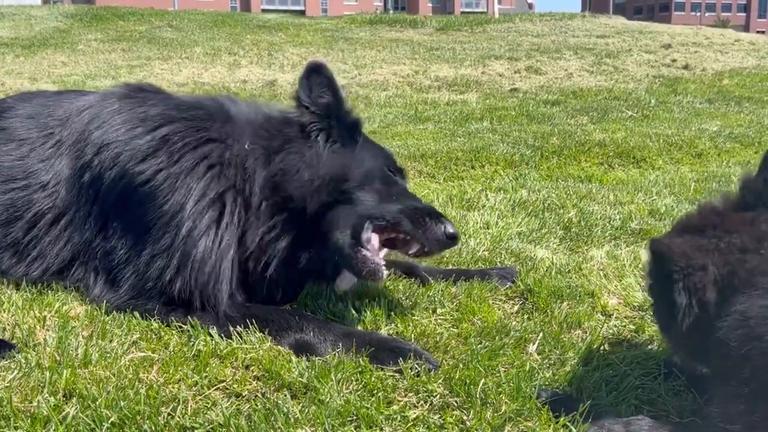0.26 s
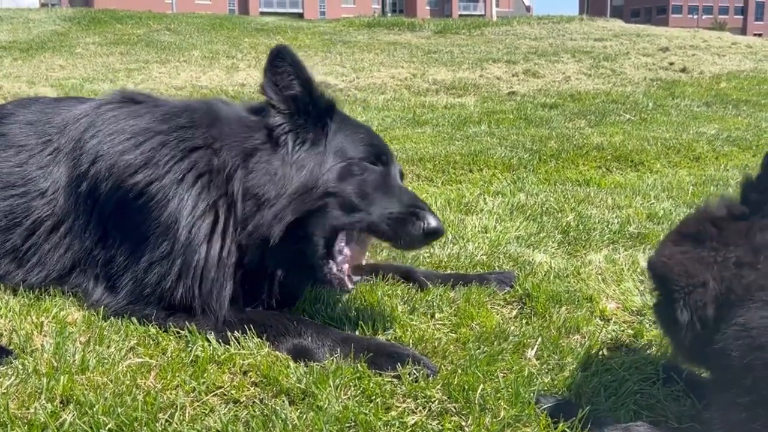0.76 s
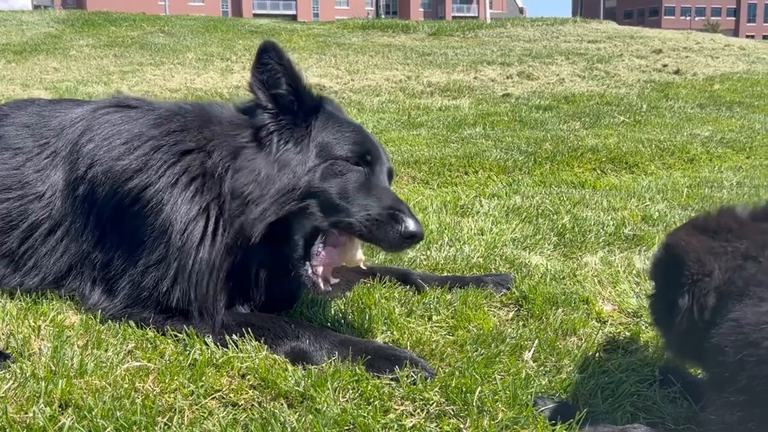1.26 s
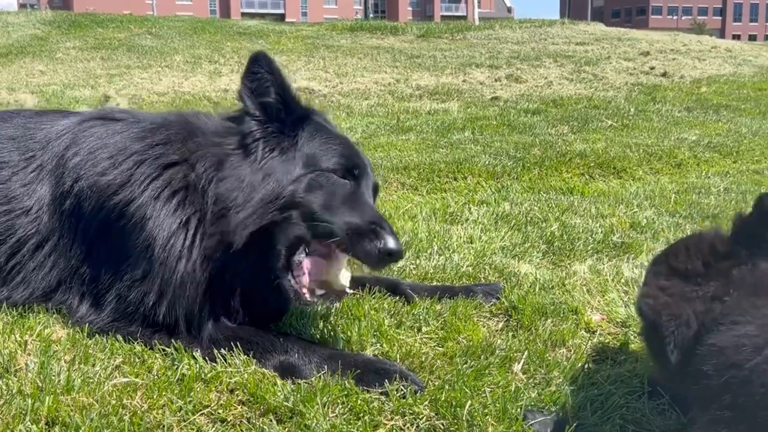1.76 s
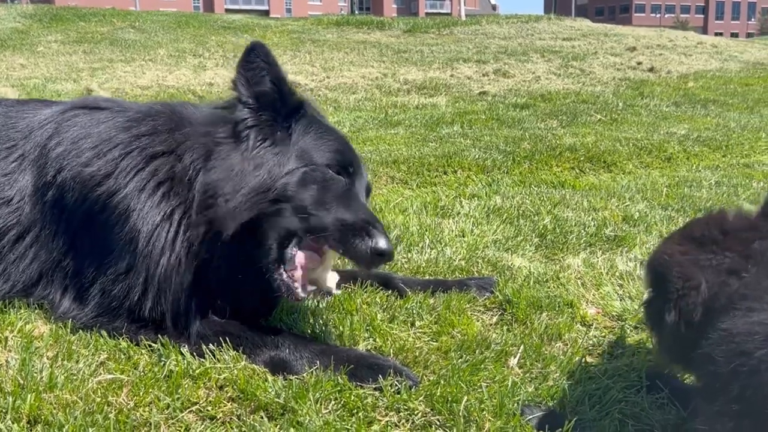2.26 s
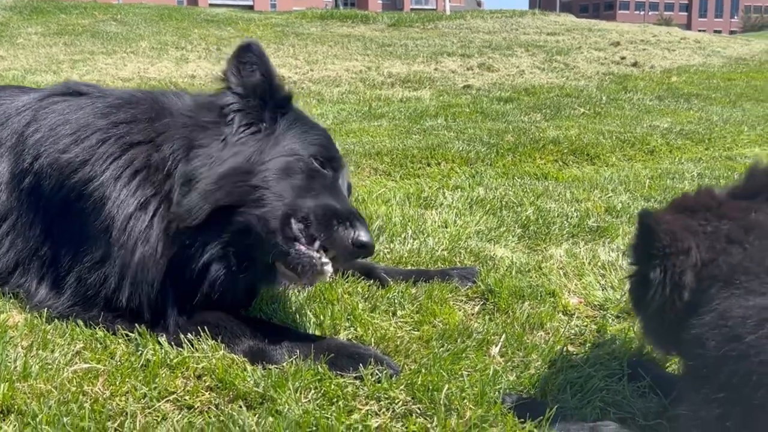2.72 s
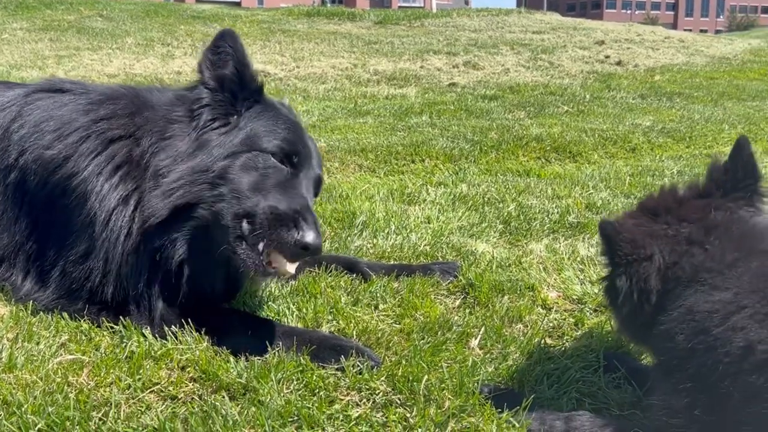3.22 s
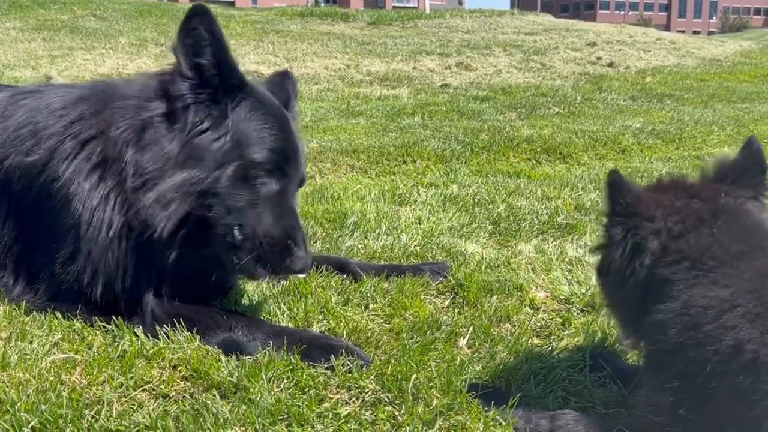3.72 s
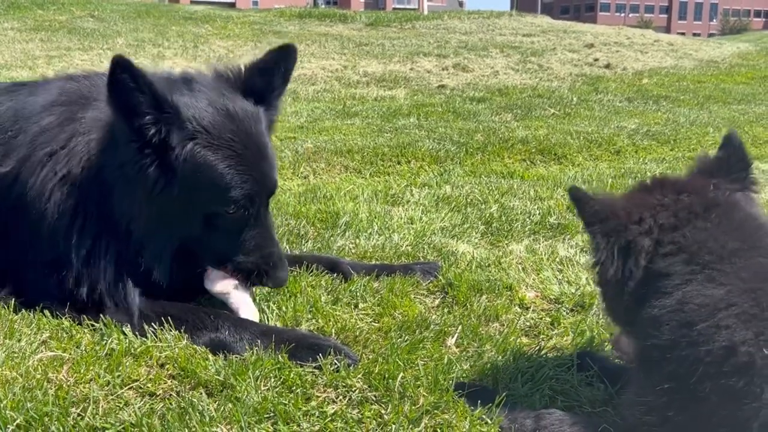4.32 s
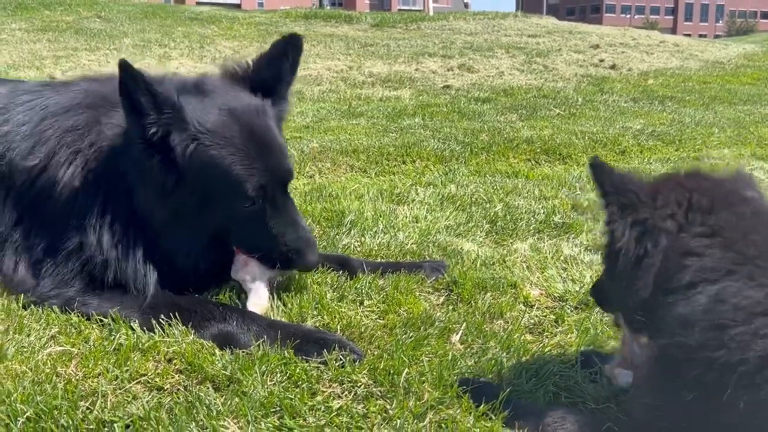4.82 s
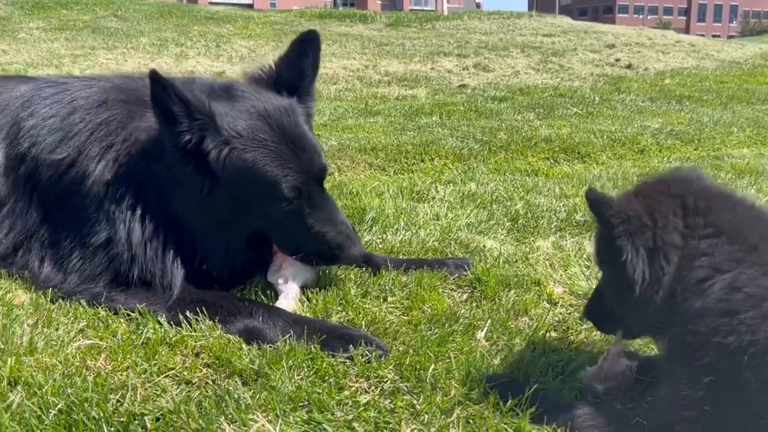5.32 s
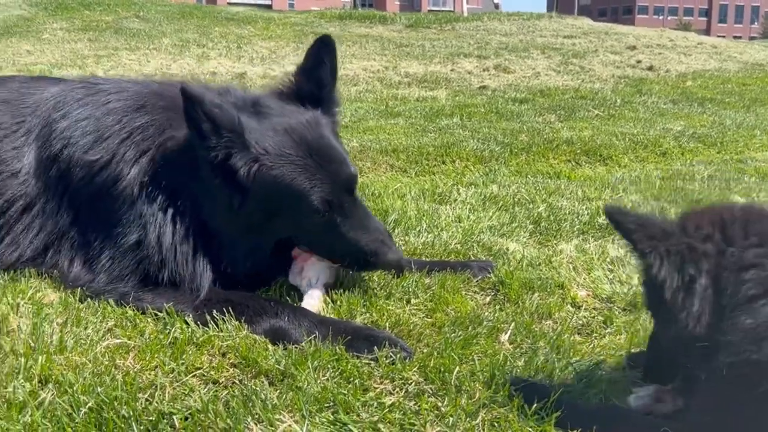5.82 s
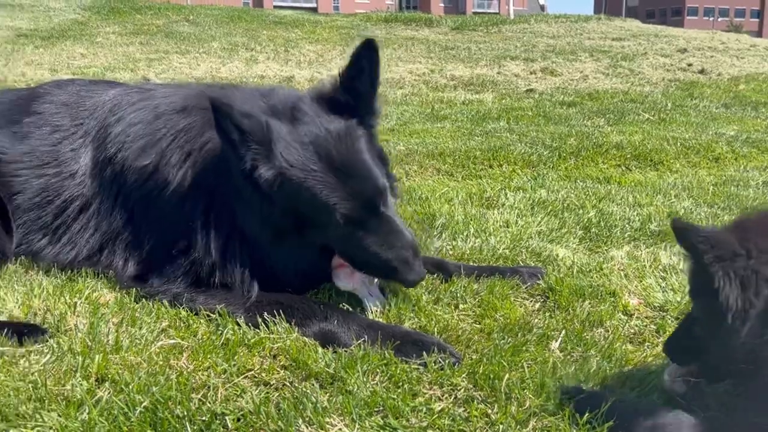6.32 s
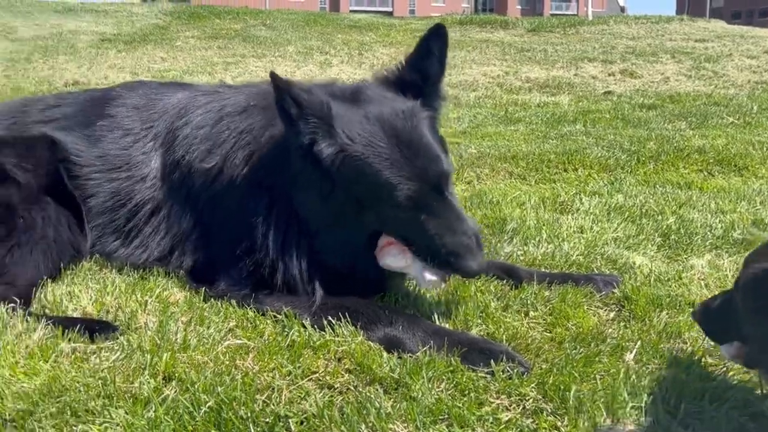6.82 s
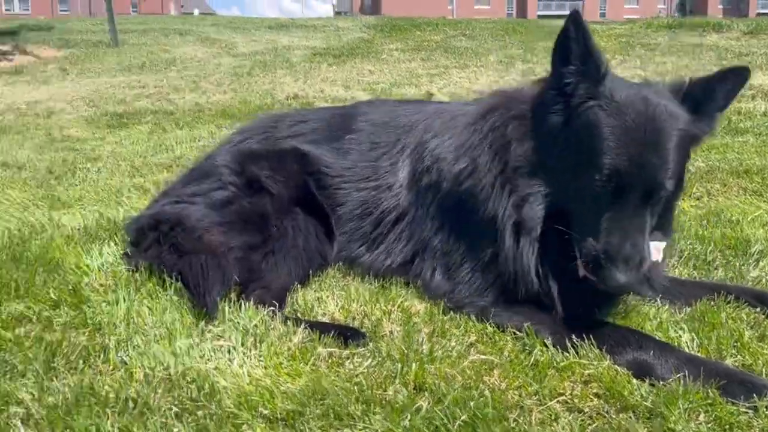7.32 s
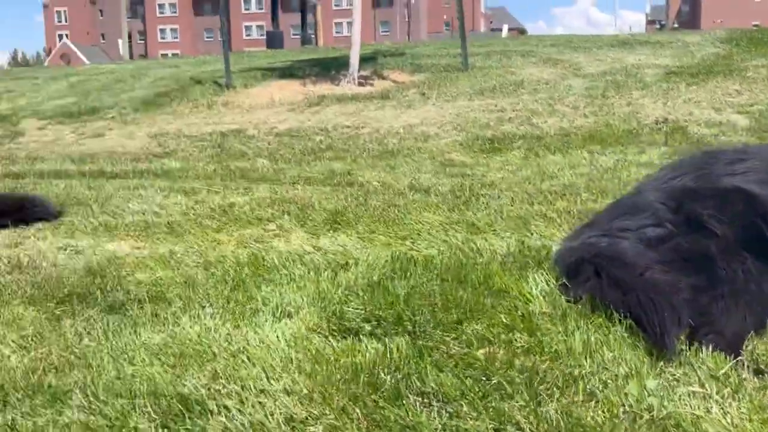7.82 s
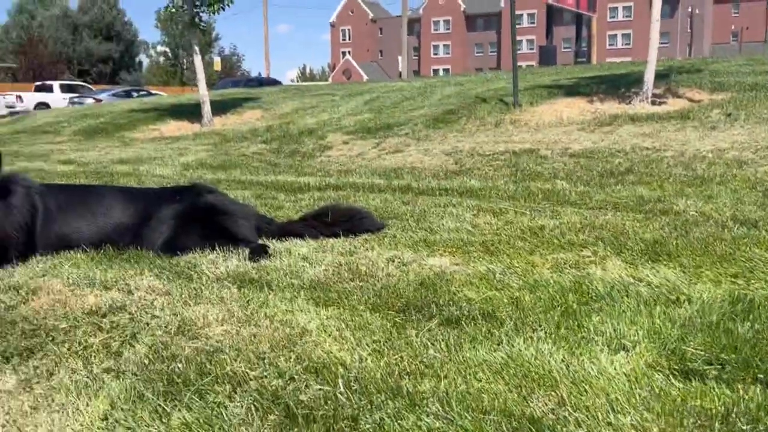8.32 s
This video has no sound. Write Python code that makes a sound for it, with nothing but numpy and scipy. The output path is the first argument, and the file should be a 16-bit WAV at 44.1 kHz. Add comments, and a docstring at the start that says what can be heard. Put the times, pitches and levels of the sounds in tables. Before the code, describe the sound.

Bones snap and crackle between a dog's teeth on an open lawn, ending in a dense wet crunching flurry above a deep town hum.

```python
"""Dogs chew raw meat and bones on an open lawn, close to a handheld two-port microphone.
Cracks are ringing noise bursts, mouth knocks are short rough tones, wet crackle is many tiny ticks.
Behind them are a town roar of shaped noise, and a machine hum and passing engines made of low tones.
Wavering sine tones are held far off, and a collar tag tinks once as a few dying sine tones."""
import sys
import numpy as np
from scipy import signal
from scipy.fft import rfft, irfft
from scipy.io import wavfile
from scipy.ndimage import uniform_filter1d

SR = 44100
rng = np.random.default_rng(int(sys.argv[2]) if len(sys.argv) > 2 else 0)


def digitize_waveform(pressure):
    """Quantize a signal to 16-bit integers and store it at the path in sys.argv[1].

    Rows of a 2-D input are taken as channels; values are limited to [-1, 1].
    """
    field = np.atleast_2d(pressure).T
    bounded = np.clip(field, -1, 1)
    quanta = np.round(bounded * 32767).astype(np.int16)
    wavfile.write(sys.argv[1], SR, quanta)


N = 377937  # length of the scene in samples

# Colour of the town roar: [f/Hz, relative level/dB per Hz]
ROAR_COLOUR = [(25, -23.5), (49, -4.5), (78, -5), (163, -13.5), (483, -21), (787, -29), (1030, -30),
               (1680, -38), (2100, -39), (2800, -40), (2950, -46), (6210, -58), (8830, -68), (12000, -71),
               (16500, -86)]
# The roar as the microphone turns: [t/s, level/dB, extra low mids/dB, extra bass/dB]
ROAR_TURNING = [(0, -38, -3, -0.45), (4, -39, -2, 0.8), (7.101, -39.5, 0.5, 0.5), (7.7, -42.5, -3, 3.5),
                (8.57, -41, -8, 2.5)]
# How the roar differs at the two ports: [f/Hz, likeness 0-1, phase of right/rad, left minus right/dB]
ROAR_PORTS = [(60, .999, -0.16, -0.2), (174, 0.94, 0.5, 2), (265, 0.94, 0.97, 1), (370, 0.9, 1.4, 3),
              (534, 0.6, 1.8, -1.5), (705, 0.5, 3.5, 1), (1070, 0.16, 2.5, -6), (1220, 0.3, 3.5, 7),
              (1470, 0.95, 5, 3), (1750, 0.59, 4, 1.5), (2150, 1, 7, 0), (3000, 0.87, 7, 0),
              (4270, 0.93, 4.5, 1), (6000, 0.6, 6.5, 0.5), (12100, 0.9, 8, -0.5)]
# Machine hum: [t/s, rms level/dB, rms level of the octave/dB], both before wavering
HUM_LEVELS = [(0, -33, -61), (.5, -36.5, -46), (2.2, -36.5, -54.5), (3.5, -38, -60), (4.3, -35.5, -49),
              (7.698, -38, -49), (8.62, -32.5, -44.5)]
HUM_HZ = 59.85  # middle pitch, before wavering
# Engines revving on the road, before wavering:
# [start t/s, length/s, firing f/Hz from, firing f/Hz to, loudest rms level/dB, octave against it/dB]
ENGINES = [(-.5, 2.18, 50.7, 48.92, -38, -14.5), (1.602, 0.98, 49.14, 55.5, -34.5, -14),
           (2.548, 0.93, 53.73, 48.8, -42, -11), (5.438, 0.97, 44.76, 56.2, -40.5, -1),
           (6.204, 0.61, 61.85, 66.2, -41, -6)]
ENGINE_SWELL_DB = 32.5  # loudest point above the start and end

# Pitches of the faint far tones: [f/Hz]
FAR_TONE_HZ = [484.5, 587, 813, 834.4, 1061]
# One row for each far tone: [start t/s, release t/s, level/dB without the faint remainder]
FAR_TONES = [(0.42, 2, -66.5), (1.3, 2.1, -66.5), (.62, 1.5, -64), (0.64, 1.72, -60.5), (0.69, 1, -63)]
TONE_FADE_DB_PER_S = 25  # extra fall after release
TONE_LINGER_DB = -8.5  # faint remainder against the tone, also there before it starts

# Ringing modes of the collar tag: [f/Hz, level/dB, time to fall 60 dB/s]
TAG_MODES = [(6050, -56, 0.03), (8250, -55, 0.097), (8650, -46.5, 0.045), (12000, -63, .03)]
TAG_S = 3.679  # time of the tink, s

# Wet crackle between the bites: [t/s, level/dB]
CHEWING_LEVEL = [(0, -81), (.9, -70.5), (3.2, -71), (3.6, -80), (7.8, -71), (7.97, -71), (8.1, -69.5),
                 (8.36, -67.5), (8.42, -65), (8.57, -65)]
# Colour of the wet crackle: [f/Hz, level/dB]
WET_COLOUR = [(700, -8), (1500, -2.5), (2500, -1), (4000, -5), (6000, -4.5), (9000, -5.5), (17000, -25)]
# Each crack swells a duller crackle around it, more for bright cracks
BITE_DB, BITE_SHARE = -63.5, 0.045  # base level, dB; added dB per dB of crack brightness
BITE_S, BITE_HZ = 0.023, 2700  # half the length of the swell, s; middle of the dull crackle, Hz

# Hollow knocks of jaw and mouth: [t/s, peak level/dB, f/Hz, fall time/cycles]
MOUTH_KNOCKS = [(.612, -40.5, 705, 2.7), (.855, -40.5, 1280, 2.8), (4.128, -40.5, 620, 1.7),
                (4.167, -41, 895, 5.1), (4.177, -35, 884, 4.1), (4.185, -35.5, 926, 3.3),
                (4.605, -38, 530, 2.1), (4.683, -46, 583, 1.9), (5.967, -36.5, 1420, 2.5),
                (7.96, -39, 910, 2.7), (7.979, -41, 890, 1.5), (8.042, -33, 910, 0.54),
                (8.049, -28, 1320, 2.1), (8.145, -35.5, 1350, 1.7), (8.403, -42, 1200, 1.5),
                (8.428, -36.5, 1465, 0.96), (8.462, -41, 1540, 2.4), (8.501, -49, 1210, 0.71)]
KNOCK_ROUGHNESS = 0.32  # rms of the noise against the tone's peak

# Bone cracks: [t/s, peak level of the ring/dB, ring f/Hz, splinters against the ring/dB]
CRACKS = [(0.241, -50.5, 4200, 7), (.277, -41, 2570, -12), (.3914, -47, 3700, -31),
          (0.4162, -37, 2320, -8.5), (.5165, -53, 2700, -30), (0.5204, -38.5, 2180, -22),
          (0.5272, -39, 2550, -31), (0.5365, -45, 2400, -33), (0.562, -33, 2470, -16),
          (.742, -47, 2300, -23), (.81, -54, 5530, -7), (0.8316, -45, 2640, -32), (.903, -51, 5600, -20),
          (.918, -45.5, 4250, -25), (.9637, -50, 4230, -28), (1.017, -53, 4450, -30),
          (1.048, -47, 2430, -10), (1.086, -48, 3220, -19), (1.0982, -31, 2620, -25),
          (1.261, -53, 4450, -21), (1.3625, -42, 3880, -3), (1.3897, -43.5, 2000, -9),
          (1.405, -48, 4300, -14), (1.453, -45.5, 3920, -19), (1.494, -32, 2270, -11),
          (1.904, -46.5, 6250, -12), (1.907, -41.5, 2400, -12), (1.971, -43.5, 3400, -29),
          (2.013, -41, 2150, -8), (2.024, -39.5, 3900, -24), (2.385, -48, 2200, -28),
          (2.407, -50, 3270, -6), (2.4437, -46, 2360, -40), (2.66, -38, 2030, -25), (2.781, -47, 2100, -35),
          (2.829, -54, 3230, -30), (2.848, -55, 8650, -2), (2.89, -40.5, 5100, -13),
          (2.8993, -34.5, 3900, -21), (3.282, -40, 2040, -18), (3.2924, -34, 2300, -18),
          (3.319, -43, 2600, -20), (3.371, -52, 4200, -26), (3.41, -51, 2000, -29), (3.594, -50, 5200, -16),
          (3.993, -50, 7360, -24), (4.056, -51, 4200, -6), (4.129, -48, 1790, -30), (4.167, -39, 2640, -28),
          (4.177, -43, 3450, -5), (4.1831, -42, 5150, 1), (5.1, -46, 3220, -33), (5.508, -52.5, 4270, 7),
          (5.8912, -36.5, 2210, -24), (5.919, -47, 4200, -18), (5.968, -27.5, 2290, -18.5),
          (6, -37.5, 2120, -28), (6.0653, -36, 1970, -47), (6.0765, -42, 1870, -34), (6.084, -52, 5000, -6),
          (6.448, -41.5, 2080, -19), (6.461, -57, 4160, -20), (6.5384, -48.5, 4000, -18),
          (6.5522, -42, 2090, -30), (6.567, -46, 2900, -26), (6.732, -43, 2040, -46),
          (6.8861, -50, 4400, -8), (6.895, -40.5, 1880, -25), (6.9084, -49, 2200, -9),
          (6.9865, -35.5, 2320, 0.5), (6.987, -33.5, 3200, -30), (7.1973, -32.5, 8500, -1),
          (7.1978, -24.5, 2510, -25), (7.1982, -26, 3360, -29), (7.5957, -52, 3430, -7),
          (7.712, -43, 3700, -40), (7.742, -48, 4260, -18), (7.9265, -48, 4600, 9), (7.9325, -57, 3000, 8),
          (7.945, -50, 3970, -12), (7.951, -48, 4570, 16), (7.9603, -33.5, 2780, 5.5),
          (7.978, -36, 2320, 4), (8.001, -52, 3000, 10), (8.019, -48.5, 2680, 6), (8.0307, -48, 3340, -3),
          (8.042, -51, 2360, -2), (8.05, -38.5, 2350, -10), (8.1454, -39, 2120, -15),
          (8.2753, -51, 2050, -29), (8.395, -31.5, 3070, -4), (8.4036, -50, 2250, 1),
          (8.414, -29.5, 3450, 0), (8.4262, -36, 2470, 2), (8.43, -46, 3860, -2), (8.4345, -33, 3700, -4),
          (8.458, -41, 3740, 3), (8.465, -37, 1660, 0), (8.498, -41, 3250, -37),
          (8.502, -50.5, 3170, -24.5), (8.5155, -51, 3900, 0), (8.528, -51, 4000, 3),
          (8.538, -51.5, 2510, 6), (8.5483, -45.5, 1810, 7.5), (8.557, -49, 3000, -2)]
# Slower breaks and grinding of teeth:
# [t/s, peak level of the ring/dB, ring f/Hz, splinters against the ring/dB, length setting/ms]
SCRAPES = [(1.801, -40.5, 4830, -3, 1.7), (1.82, -51.5, 3930, -5, 11), (2.22, -39.5, 2200, -24, 4.4),
           (2.298, -45.5, 3950, -11, 3.2), (3.605, -47.5, 1570, -41, 9.5), (7.646, -48, 2000, -3.5, 8.9),
           (8.322, -53.5, 3560, -4, 4.7), (8.42, -56, 3020, 8, 9.1), (8.453, -50, 2190, -3, 7.6)]
# Resonances of the bone, before each break stirs them: [f/Hz, level/dB]
BONE_MODES = [(2250, 3), (3800, 2.5), (5250, -2.5), (7400, -5.5)]
BONE_WIDTH, BONE_SPREAD_DB = 0.18, 4  # width as a share of pitch; size of the uneven stirring, dB
# Colour of the splinters: [f/Hz, level/dB]
SPLINTER_COLOUR = [(4000, -36.5), (6500, -1), (8500, 0.5), (12000, -5), (17000, -8)]
CRACK_MS = 0.83  # length setting of a crack at 0 dB brightness, ms
BRIGHT_SHORTENS = 0.11  # brighter cracks are shorter: dB of length per dB
GRIT_DB, GRIT_SHARE = 0, 0.46  # grit against the ring: base dB, plus a share of the brightness

# Near and far-tone sounds at the right port against the left: [f/Hz, phase/rad]
NEAR_PHASE = [(500, 0.22), (1300, -1.4), (2150, 0.2), (3300, -1.1), (6000, 0.77), (9000, -1.33),
              (13000, -1.46)]
# Treble colour of the whole sound, with dips near 10 and 14 kHz: [f/Hz, level/dB]
TREBLE_COLOUR = [(9000, 0), (10200, -15), (11300, 3), (12700, 0.5), (14000, -13), (15300, -5)]
EDGE_HZ = 16600  # upper band limit


def gain_of(db):
    """Turns decibels into gain."""
    return 10 ** (np.asarray(db) / 20)


def evened(x):
    """Scales a signal to rms 1."""
    return x / np.sqrt(np.mean(x ** 2) + 1e-20)


def smoothed(x, size):
    """Averages twice over a sliding stretch, leaving only slow changes."""
    return uniform_filter1d(uniform_filter1d(x, size), size)


def read(points, hz):
    """Reads every column of a table on a log-frequency axis."""
    f, *columns = np.transpose(points)
    return np.squeeze([np.interp(np.log(hz + 1), np.log(f + 1), c) for c in columns])


def add(mix, s, sound):
    """Mixes a sound in at a time in seconds."""
    part = mix[round(s * SR):][:len(sound)]
    part += sound[:len(part)]


def band(hz, centre_hz, width):
    """A broad resonance, with its half width as a share of its pitch."""
    return 1 / (1 + ((hz - centre_hz) / (width * centre_hz)) ** 2)


def burst(noise, colour, ms, rise_ms):
    """Coloured noise that swells and falls, peak 1; longer breaks build up more slowly."""
    t_ms = np.arange(len(noise)) / SR * 1000
    ms = max(ms, 0.2)
    slow_rise_ms = rise_ms + 0.8 * max(ms - 1.6, 0)
    rise = (1 - np.exp(-t_ms / slow_rise_ms)) ** 2
    fall = np.exp(-t_ms / (1.49 * ms))
    x = irfft(rfft(noise) * colour) * rise * fall
    return x / abs(x).max()


def roar():
    """Distant traffic and ventilation: wide noise in faint patches, partly alike at the two ports."""
    frames, hz = N // 512 + 5, np.fft.rfftfreq(2048, 1 / SR)
    a, b, c, d, patches = rng.standard_normal((frames, 1025, 5)).T
    # patches are smooth over pitch and time
    patches = evened(uniform_filter1d(uniform_filter1d(patches, 20, 0), 8, 1))
    s, db, body_db, bass_db = np.transpose(ROAR_TURNING)
    t = np.arange(frames) * 512 / SR

    same, phase, lean_db = read(ROAR_PORTS, hz)[:, :, None]
    same = np.clip(same, 0, 1)
    left = a + 1j * b
    right = same * np.exp(1j * phase) * left + np.sqrt(1 - same ** 2) * (c + 1j * d)
    spectrum = np.array([left * gain_of(lean_db / 2), right * gain_of(-lean_db / 2)])

    colour_db = read(ROAR_COLOUR, hz)[:, None]
    patch_db = 2.05 * patches * (hz / (hz + 500))[:, None]  # weaker in the bass
    low_mid_db = band(hz, 440, 0.22)[:, None] * np.interp(t, s, body_db)
    low_db = band(hz, 160, 0.93)[:, None] * np.interp(t, s, bass_db)
    spectrum *= gain_of(colour_db + patch_db + low_mid_db + low_db)
    noise = signal.istft(spectrum, nperseg=2048, noverlap=1536)[1][:, :N]
    return evened(noise) * gain_of(np.interp(np.arange(N) / SR, s, db))


def drone(rows, waver, throb_db):
    """A low tone and its octave, pitch and level wavering a little."""
    s, *columns = np.transpose(rows)
    t = np.arange(s[0], s[-1], 1 / SR)
    hz, db, octave_db = (np.interp(t, s, c) for c in columns)
    drift = evened(smoothed(rng.standard_normal(len(t)), 3000))
    phase = 2 * np.pi * (np.cumsum(hz * (1 + waver * drift)) / SR + rng.random())
    throb = evened(smoothed(rng.standard_normal(len(t)), 5000))
    tones = gain_of(db) * np.sin(phase) + gain_of(octave_db) * np.sin(2 * phase)
    out = np.zeros(N)
    add(out, s[0], np.sqrt(2) * gain_of(throb_db * throb) * tones)
    return out


def machine_hum():
    """A machine's steady low tone and octave, their levels slowly changing."""
    rows = [(s, HUM_HZ, db, octave_db) for s, db, octave_db in HUM_LEVELS]
    return drone(rows, waver=0.01, throb_db=1.26)


def passing_engine(start, length, from_hz, to_hz, db, octave_db):
    """An engine's firing tone glides in pitch while its level swells and falls."""
    u = np.linspace(max(-start / length, 0), 1, num=12)  # share of the pass, skipping time before 0
    s = np.maximum(start + u * length, 0)
    hz = from_hz + (to_hz - from_hz) * u
    level_db = db - ENGINE_SWELL_DB * (2 * u - 1) ** 4
    rows = np.transpose([s, hz, level_db, level_db + octave_db])
    return drone(rows, waver=0.0098, throb_db=-1.0)


def far_tones():
    """Held tones that swell in, waver, slowly weaken and sink faster once released."""
    t, out = np.arange(N) / SR, np.zeros(N)
    waver = smoothed(rng.standard_normal((len(FAR_TONE_HZ), N)), 5000)
    for hz, (start, release, db), w in zip(FAR_TONE_HZ, FAR_TONES, waver):
        since_release = np.maximum(t - release, 0)
        fall_db = np.maximum(200 * (start - t), 1.5 * (t - start)) + TONE_FADE_DB_PER_S * since_release
        level = gain_of(-fall_db) + gain_of(TONE_LINGER_DB - 1.9 * since_release)
        tone = np.sin(2 * np.pi * (hz * t + rng.random()))
        out += level * gain_of(db + 1.7 * evened(w)) * tone
    return out


def tag_tink():
    """A struck metal tag rings at several pitches, each dying at its own speed."""
    out, t = np.zeros(N), np.arange(SR // 4) / SR
    for (hz, db, t60), phase in zip(TAG_MODES, rng.random(len(TAG_MODES))):
        rise = np.minimum(t * hz / 8, 1)  # full after 8 cycles
        add(out, TAG_S, gain_of(db - 60 * t / t60) * np.sin(2 * np.pi * (hz * t + phase)) * rise)
    return out


def chewing():
    """Worked meat gives many tiny sticky ticks of varied pitch in clumps, with a duller swell at bites."""
    s, db = np.transpose(CHEWING_LEVEL)
    clumps = evened(smoothed(rng.standard_normal(N), 600))
    chance = 1200 * gain_of(4.0 * clumps) / SR  # chance of a tick at each sample
    tick_db = 4.4 * np.minimum(rng.exponential(1, N), 3.4)
    size = gain_of(tick_db) * (rng.random(N) < chance)
    kind, hz, out = rng.integers(0, 24, N), np.fft.rfftfreq(256, 1 / SR), np.zeros(N)
    for k, pitch_hz in enumerate(np.geomspace(800, 13000, num=24)):
        tick = burst(rng.standard_normal(256), band(hz, pitch_hz, 0.3) ** 2, 0.9, rise_ms=0.5)
        out += signal.oaconvolve(size * (kind == k), tick)[:N]

    full_hz = np.fft.rfftfreq(N, 1 / SR)
    wet = irfft(rfft(out) * gain_of(read(WET_COLOUR, full_hz)), N)
    dull = irfft(rfft(wet) * band(full_hz, BITE_HZ, 1.0), N)
    bite_power = np.zeros(N)
    swell = signal.windows.hann(round(2 * BITE_S * SR))
    for at, *_, bright_db in CRACKS:
        power = gain_of(BITE_DB + BITE_SHARE * bright_db) ** 2
        add(bite_power, max(at - 0.6 * BITE_S, 0), power * swell)
    between = evened(wet) * gain_of(np.interp(np.arange(N) / SR, s, db))
    return between + evened(dull) * np.sqrt(bite_power)


def mouth_knocks():
    """The mouth cavity rings briefly at one pitch, roughened by the wet flesh around it."""
    out, t, spread_hz = np.zeros(N), np.arange(2048) / SR, np.fft.rfftfreq(2048, 1 / SR)
    for (s, db, hz, cycles), noise in zip(MOUTH_KNOCKS, rng.standard_normal((len(MOUTH_KNOCKS), 2048))):
        rough = evened(irfft(rfft(noise) * band(spread_hz, 1.12 * hz, 0.36) ** 2))
        tone = np.sin(2 * np.pi * hz * t) + KNOCK_ROUGHNESS * rough
        knock = tone * (1 - np.exp(-t / 0.001)) * np.exp(-t * hz / cycles)
        add(out, s, gain_of(db) * knock / abs(knock).max())
    return out


def with_crumbs(breaks):
    """Adds a sparse, fading spatter of tiny falling crumbs after each break, its pattern changing over time."""
    t = np.arange(150, 2500) / SR
    patterns = []
    for _ in range(3):
        hits = rng.standard_normal(len(t)) * (rng.random(len(t)) < 220 / SR)  # about 220 a second
        patterns.append(np.r_[1, np.zeros(149), gain_of(-22 - 60 * t / 0.11) * hits])
    # three rotating weights, whose squares always sum to 1, blend the patterns
    turns = np.arange(N) / SR * 7.3 + np.arange(3)[:, None] / 3
    share = np.cos(2 * np.pi * turns) * np.sqrt(2 / 3)
    return sum(w * signal.oaconvolve(breaks * w, p)[:N] for w, p in zip(share, patterns))


def bone_cracks():
    """Each break rings the piece of bone, grinds and sheds bright splinters; crumbs follow."""
    out, hz, t = np.zeros(N), np.fft.rfftfreq(2048, 1 / SR), np.arange(2048) / SR
    rows = [(*row, CRACK_MS / gain_of(BRIGHT_SHORTENS * row[3])) for row in CRACKS] + SCRAPES
    noises = rng.standard_normal((len(rows), 3, 2048))
    for (s, db, ring_hz, bright_db, ms), noise in zip(rows, noises):
        # the first blow rings true, the duller the truer
        clear = 0.53 / gain_of(0.21 * bright_db) * np.sin(2 * np.pi * ring_hz * t) * np.exp(-t / 0.0026)
        ring = burst(noise[0] + clear, band(hz, ring_hz, 0.49) ** 2, ms, rise_ms=0.46)
        bone = 0
        for (mode_hz, level_db), chance in zip(BONE_MODES, noise[2]):
            bone = bone + gain_of(level_db + BONE_SPREAD_DB * chance) * band(hz, mode_hz, BONE_WIDTH)
        grit = burst(noise[1], bone * band(hz, 4000, 1.0), 1.47 * ms, rise_ms=0.26)
        splinter = burst(noise[2], gain_of(read(SPLINTER_COLOUR, hz)), 0.95 * ms, rise_ms=0.25)
        grit_gain = gain_of(GRIT_DB + GRIT_SHARE * bright_db)
        crack = ring + grit_gain * grit + gain_of(bright_db) * splinter
        add(out, s - 0.0003, gain_of(db) * crack)  # begins just ahead of the listed time
    return with_crumbs(out)


def at_ports(x, lean_db):
    """A sound reaches the two ports with a phase shift that varies with pitch, and a small level lean."""
    half_shift = np.exp(0.5j * read(NEAR_PHASE, np.fft.rfftfreq(N, 1 / SR))) / gain_of(lean_db / 2)
    return irfft(rfft(x) * np.array([1 / half_shift, half_shift]), N)


def scene():
    """Mixes the town, the far tones and the chewing dogs into two channels."""
    low = machine_hum() + sum(passing_engine(*row) for row in ENGINES)
    mouth = chewing() + mouth_knocks() + bone_cracks()
    pointed = at_ports(far_tones() + tag_tink() + mouth, lean_db=0.9)  # left louder by 0.9 dB
    return roar() + low * gain_of([[0.15], [-0.15]]) + pointed


def record(dry):
    """The treble is coloured and the deepest bass dropped; then comes the band limit."""
    wide = np.pad(dry, ((0, 0), (2048, 2048)), "reflect", reflect_type="odd")  # room for filter edges
    size = wide.shape[1]
    colour = gain_of(read(TREBLE_COLOUR, np.fft.rfftfreq(size, 1 / SR)))
    coloured = irfft(rfft(wide) * colour, size)
    thin = signal.sosfilt(signal.butter(4, 35, "highpass", fs=SR, output="sos"), coloured)
    band_limit = signal.firwin(511, EDGE_HZ, window=("kaiser", 9), fs=SR)
    return signal.oaconvolve(thin, band_limit[None], "same")[:, 2048:-2048]


dry = scene()
out = record(dry)
digitize_waveform(out)
```